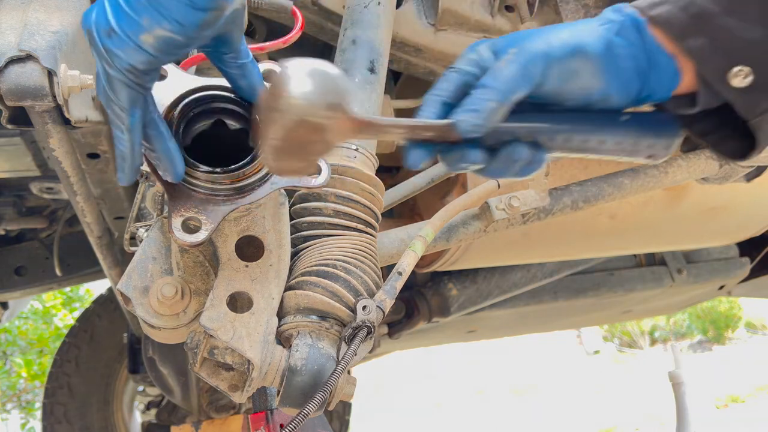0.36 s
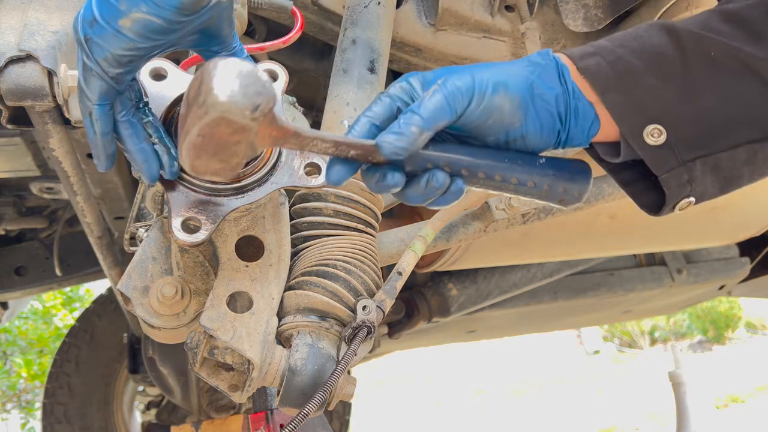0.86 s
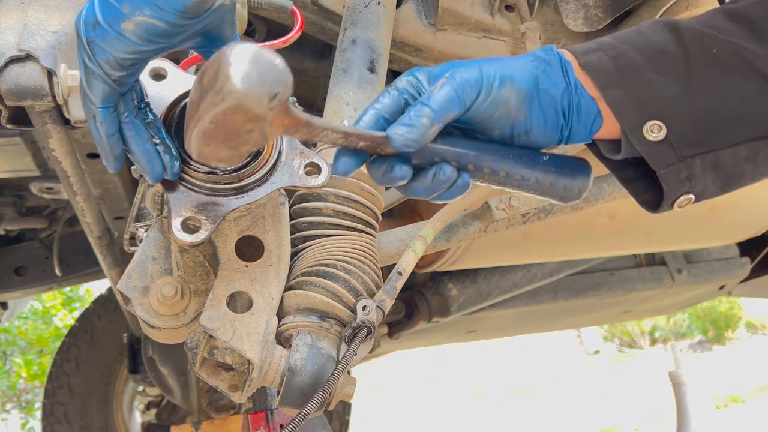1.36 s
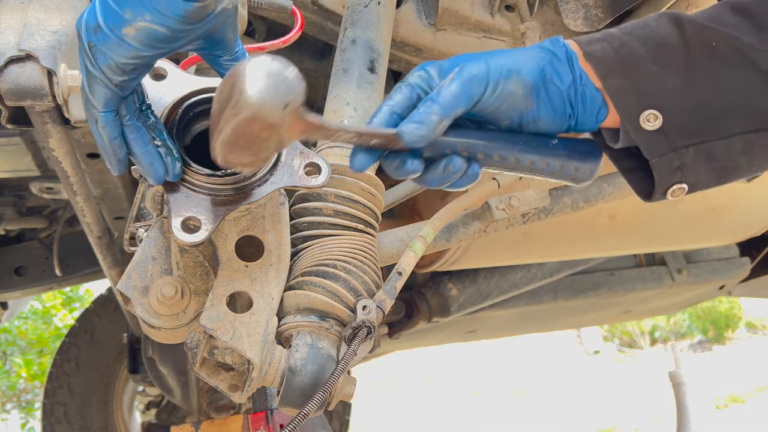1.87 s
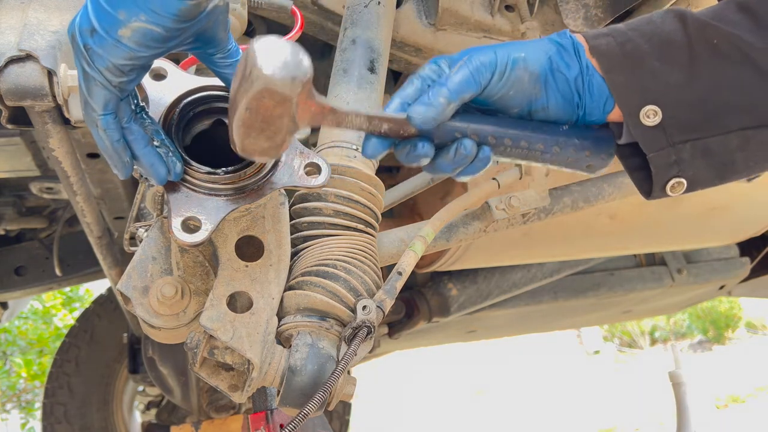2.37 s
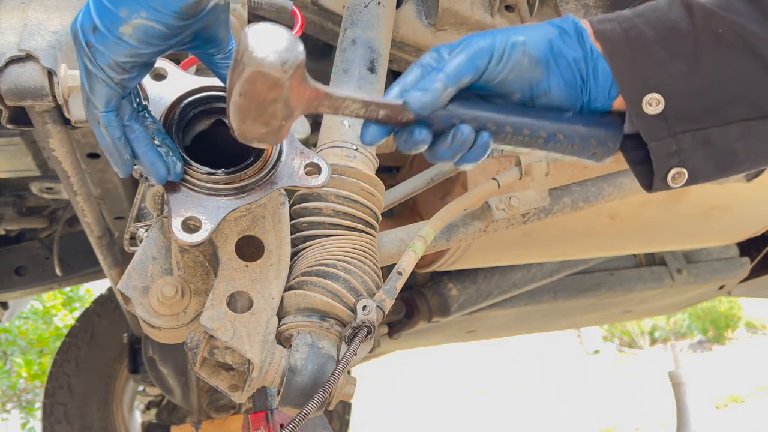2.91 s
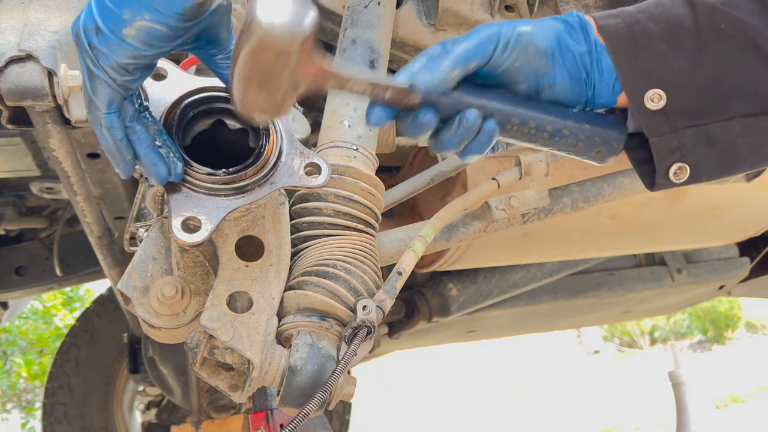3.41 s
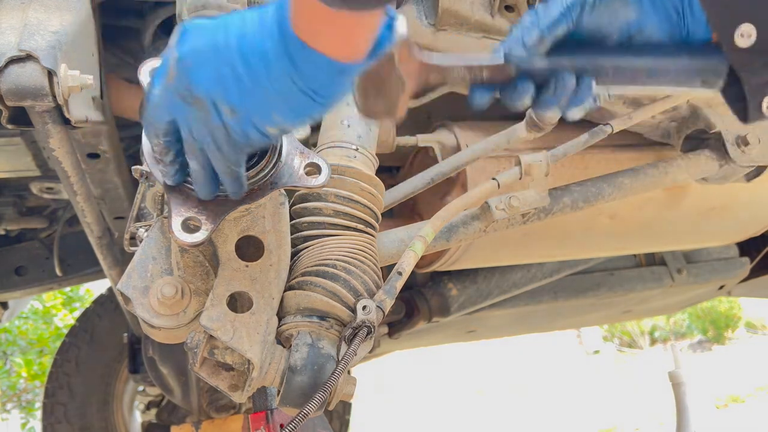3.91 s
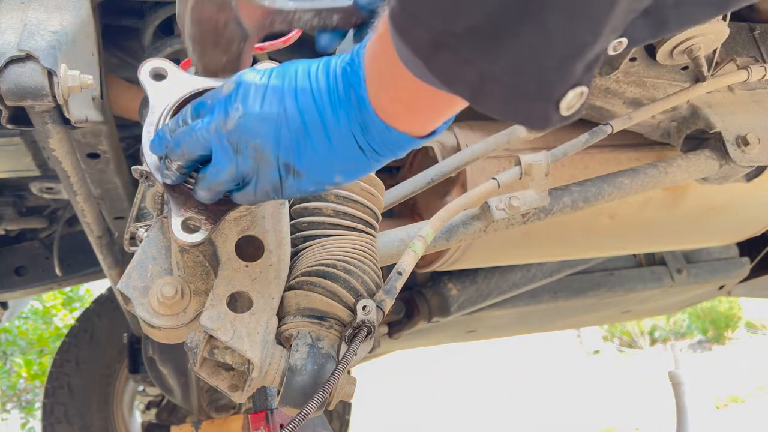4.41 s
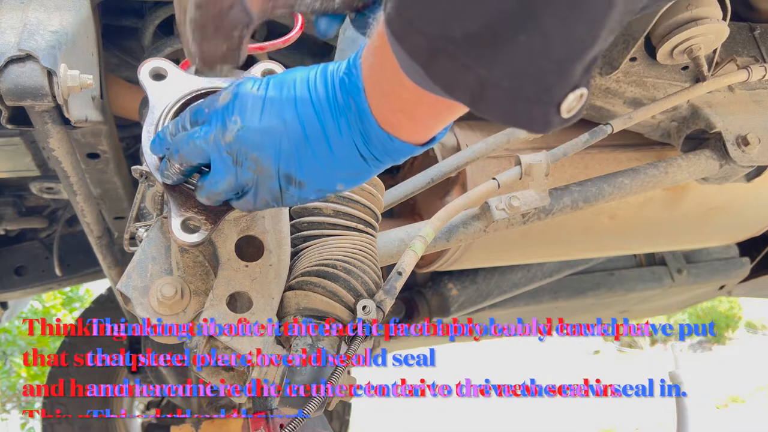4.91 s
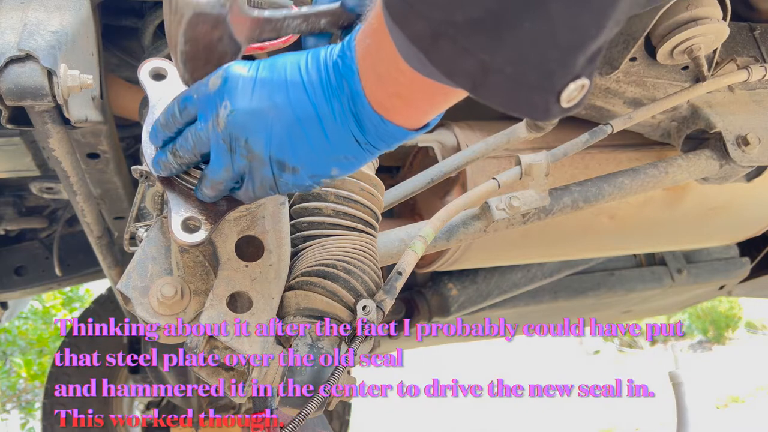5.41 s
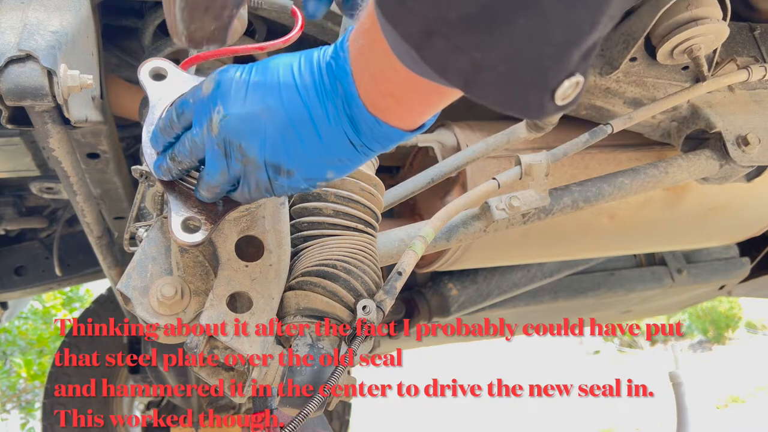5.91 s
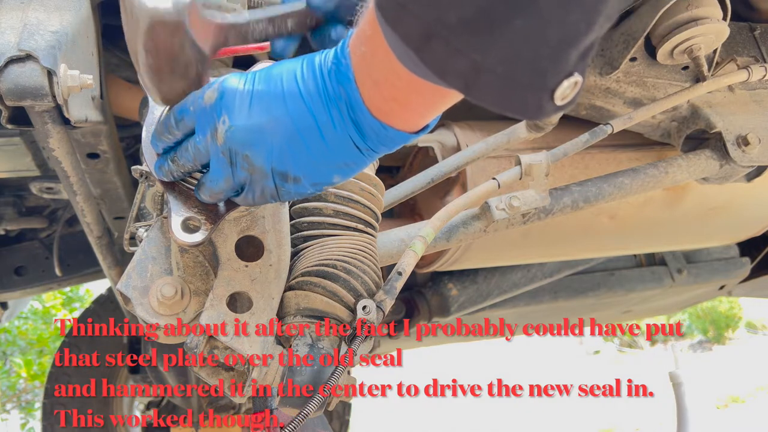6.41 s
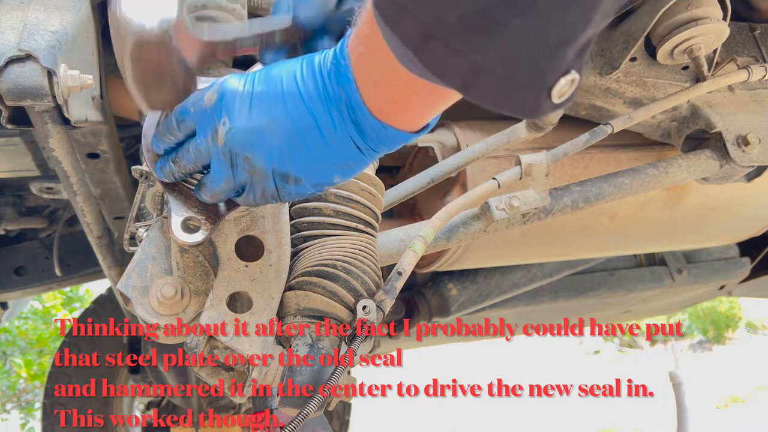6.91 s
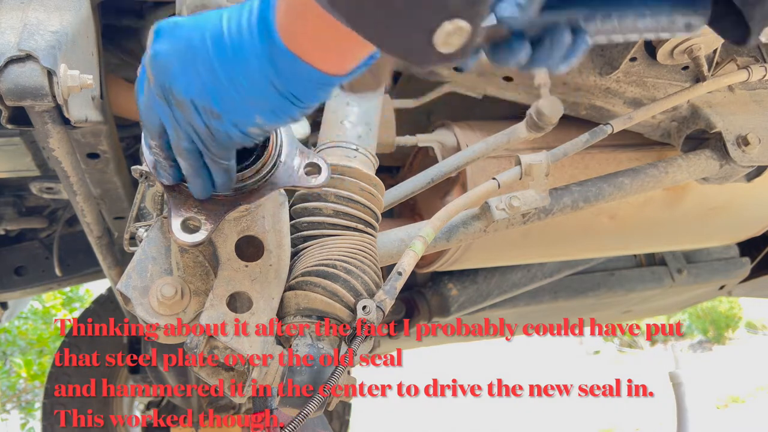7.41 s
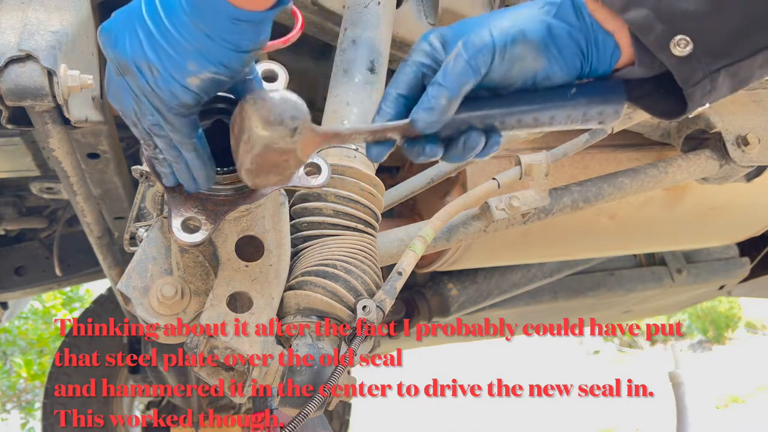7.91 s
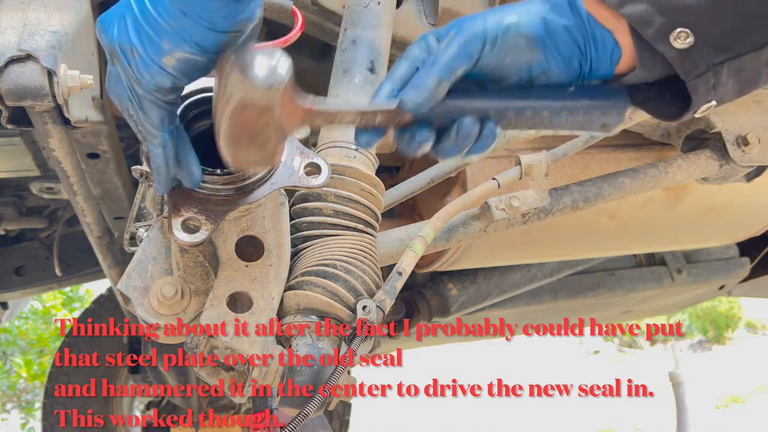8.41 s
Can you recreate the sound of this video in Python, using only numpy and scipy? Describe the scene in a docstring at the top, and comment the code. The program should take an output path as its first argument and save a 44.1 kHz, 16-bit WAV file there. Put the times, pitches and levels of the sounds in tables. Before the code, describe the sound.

Close to a phone under a vehicle, gloves rustle strongly at the very start, then small metal scratches and ticks sound from 0.3 to 0.5 s, slightly left. A light tap at 0.65 s opens a run of hammer blows roughly every 0.27 s, growing firmer until 1.7 s. After a short gap, a very faint tap at 2.25 s leads to four solid hits from 2.5 to 3.4 s. Each is a sharp clack with short metallic ringing, a low suspension thump just behind and a quieter scattered tail. Gloves rustle from 3.5 s, with ticks around 3.9 to 4.3 s. Blows resume at 4.7 s, with weaker taps at 5.04 and 5.4 s and a clink between, then strong regular hits from 5.7 to 6.9 s. Rustling returns around 7.1 to 8.5 s, with three blows at 7.8, 8.1 and 8.4 s. Low rumble swells under the runs.

```python
"""Hammering a seal into a wheel hub

A steel hammer taps a seal into a wheel hub under a vehicle, in short runs, close to a phone.
Each blow is banded noise and decaying metal modes for the crack, low swinging modes for the
suspension's thump just after, and a quieter, longer noise tail scattered by the underbody.
Gloves rustle as patchy hiss and parts tick as short scratches, over a low rumble of coloured
noise whose level is drawn to rise under the runs of blows."""
import sys
import numpy as np
from scipy import signal
from scipy.fft import rfft, irfft, next_fast_len
from scipy.io import wavfile
from scipy.ndimage import uniform_filter1d

SR = 44100
rng = np.random.default_rng(int(sys.argv[2]) if len(sys.argv) > 2 else 0)


def field_ratio(decibels):
    """Amplitude ratio for a level in dB (20 dB per decade); scalars and array-likes work."""
    return 10 ** (np.asarray(decibels, dtype=float) / 20)


def master_out(mix):
    """Clip the mix to full scale and print it as 16-bit PCM to the path in sys.argv[1]."""
    frames = np.transpose(np.atleast_2d(mix))
    ceiling = np.clip(frames, -1, 1)
    pcm = np.round(ceiling * 32767).astype(np.int16)
    wavfile.write(sys.argv[1], SR, pcm)


N = 376613  # samples


def evened(x):
    """Scales to rms 1."""
    return x / np.sqrt(np.mean(x ** 2) + 1e-20)


def read(points, hz):
    """Reads a table on a log-frequency axis."""
    f, value = np.transpose(points)
    return np.interp(np.log(hz + 1), np.log(f + 1), value)


def add(mix, start_s, sound, pan_db):
    """Mixes a two-channel sound in, with pan_db between left and right."""
    part = mix[:, round(start_s * SR):][:, :sound.shape[1]]
    sides = field_ratio(np.array([[pan_db / 2], [-pan_db / 2]]))
    part += (sound * sides)[:, :part.shape[1]]


def pair(shape, likeness):
    """Two random spectra, left and right, partly alike."""
    left, other = rng.standard_normal((2, *shape)) + 1j * rng.standard_normal((2, *shape))
    return np.array([left, likeness * left + np.sqrt(1 - likeness ** 2) * other])


def to_sound(spectra):
    """Overlaps short-time spectra (channel, bin, frame) into sound."""
    return signal.istft(spectra, nperseg=1024, noverlap=768)[1]


def steady(colour, likeness, patchy_db, field_db=0):
    """Noise from random short-time spectra whose level drifts in patches of time and pitch."""
    frames, hz = N // 256 + 5, np.fft.rfftfreq(1024, 1 / SR)
    patches = uniform_filter1d(rng.standard_normal((frames, 513)), 8, 0)
    patches = evened(uniform_filter1d(patches, 12, 1))
    level_db = read(colour, hz) + patchy_db * patches + field_db
    spectra = pair((frames, 513), read(likeness, hz)) * field_ratio(level_db)
    return to_sound(spectra.transpose(0, 2, 1))[:, :N]


def rumble():
    """Low coloured rumble: random noise, mostly bass, with a level that swells under the hammering."""
    # spectrum: hz, level_db (per Hz, relative)
    rumble_colour = [(18, -53), (30, -24.5), (51, -1.5), (76, -2.5), (124, -9), (208, -20.5), (241, -21),
                     (348, -23.5), (375, -37), (413, -29.5), (490, -44), (528, -33), (642, -44),
                     (10500, -71), (13600, -95.5), (22000, -120)]
    # left-right likeness: hz, likeness (0 to 1)
    rumble_likeness = [(60, 0.99), (180, 0.94), (550, 0.73), (1650, 0.14), (4970, 0.1), (15000, 0.12)]
    # level of the low rumble, rising under the runs of blows: time_s, level_db
    rumble_level = [(0.0, -47), (0.7, -47), (1.65, -41), (2.4, -45.5), (3.5, -39.5), (3.8, -45.5),
                    (4.4, -47), (4.95, -43), (5.6, -46.5), (6.55, -42), (7.2, -46), (7.6, -44.5),
                    (7.9, -46.5), (8.54, -41)]
    time_s, level_db = np.transpose(rumble_level)
    noise = evened(steady(rumble_colour, rumble_likeness, patchy_db=0.87))
    return field_ratio(np.interp(np.arange(N) / SR, time_s, level_db)) * noise


def rustle():
    """Gloves and sleeves: patchy hiss; each movement rises, holds and fades, the loudest setting brightness."""
    # spectrum before the brightness tilt: hz, level_db (per Hz, relative)
    rustle_colour = [(290, -32.5), (500, 1.5), (2000, -6), (7300, -7), (9060, -0.5), (10200, -7.5),
                     (12900, -9.5), (15800, -8)]
    # movements: start_s (already fully risen), hold_s, level_db, bright_db (per octave)
    movements = [(0.0, 0.17, -52.5, 0), (0.243, 0.23, -64.5, -2.5), (.52, .12, -69, -2.5),
                 (2.019, .03, -69, 3), (3.521, 0.27, -58, -1.5), (3.85, 0.47, -66, -2.5),
                 (7.097, 0.22, -68.5, -3), (7.364, 0.35, -60, 0), (7.73, .09, -57.5, 1.5),
                 (8.052, .07, -53.5, 3.5), (8.2, .34, -57, 0)]
    rise_s, t60_s = 0.04, 0.33
    still_db, still_bright_db = -81.5, -5.5  # hiss of the air when the hands rest

    start_s, hold_s, level_db, bright_db = np.transpose(movements)[:, :, None]
    frame_s = np.arange(N // 256 + 5) * 256 / SR
    since = frame_s - start_s
    rise = np.clip(since / rise_s + 1, 0, 1)
    fade_db = -60 * np.maximum(since - hold_s, 0) / t60_s
    power = (rise * field_ratio(level_db + fade_db)) ** 2
    still = field_ratio(still_db) ** 2
    total = power.sum(0) + still
    # brightness is averaged by power
    tilt_db = ((power * bright_db).sum(0) + still * still_bright_db) / total

    octaves = np.log2(np.fft.rfftfreq(1024, 1 / SR) / 5000 + 0.01)  # from about 5 kHz
    untilted = field_ratio(read(rustle_colour, 5000 * 2 ** octaves))[:, None]
    plain_level = np.std(to_sound(pair((513, 60), 0) * untilted))
    likeness = [(500, 0.47), (9000, 0.6)]  # hz, left-right likeness
    hiss = steady(rustle_colour, likeness, 1.6, tilt_db[:, None] * octaves) / plain_level
    return hiss * np.interp(np.arange(N) / SR, frame_s, np.sqrt(total))


def tick(level_db, pitch_hz, mode_db):
    """Parts touching lightly: a brief scratch of noise around the pitch, and a small mode at it."""
    t = np.arange(6000) / SR
    band = signal.butter(2, [pitch_hz / 8.4, min(pitch_hz * 2.14, 8800)], "band", fs=SR)
    noise = rng.standard_normal(6000) + 0.5 * rng.standard_normal((2, 6000))  # partly shared by the sides
    scratch = signal.lfilter(*band, noise)
    fade = field_ratio(-60 * t / 0.039) + 0.18 * field_ratio(-60 * t / 0.4)
    mode = field_ratio(mode_db - 60 * t / 0.09) * np.sin(2 * np.pi * pitch_hz * t)
    attack = np.minimum(1, t / 0.0022)
    return field_ratio(level_db) * attack * (0.4 * scratch * fade + mode)


def contacts(rebound_db):
    """The face lands, chatters and lands again a few ms later: times in s and sizes."""
    when, luck = rng.random((2, 4))
    sizes = field_ratio(np.array([0, rebound_db, *(-9 - 42.0 * luck)]))
    times_s = [0, 0.0042, *(0.001 + 0.011 * when)]
    return list(zip(times_s, sizes / np.linalg.norm(sizes)))


def crack_and_scatter(t, hz, colour, touches):
    """Noise in bands: each has a quick crack and a long scattered tail, with snaps at the touches."""
    # bands of a blow: centre_hz, rise_s, crack_db, crack_t60_s, tail_db, tail_t60_s (levels before colour)
    bands = [(69.6, 0.012, -12.5, 0.23, -14, 0.43), (154, 0.0067, -5.5, 0.19, -10.5, 0.55),
             (350, 0.0095, -1, .17, -12, 0.59), (643, 0.0055, -3.5, 0.16, -12, 0.41),
             (1360, 0.0031, 3, 0.07, -15.5, 0.46), (2400, 0.003, -7, 0.061, -19.5, 0.34),
             (4000, 0.00058, -9.5, 0.029, -27, 0.42), (6070, 0.0018, -7, 0.062, -20, 0.45),
             (9840, 0.0051, -5, 0.034, -24.5, 0.27), (9700, .001, 1, 0.016, -25.5, 0.33),
             (15500, 0.0011, -2.5, 0.036, -30, 0.25)]
    # left-right likeness: hz, likeness (0 to 1)
    blow_likeness = [(160, 0.99), (400, 0.66), (900, 0.52), (3500, 0.38), (6000, 0.31), (9000, 0.21),
                     (13000, 0.18)]
    snap = np.zeros(len(t))
    for touch_s, touch_size in touches:
        since = abs(t - touch_s)
        snap += touch_size * (t >= touch_s) * field_ratio(-60 * since / 0.0053) * np.minimum(1, since / 0.00036)
    noise = pair(hz.shape, read(blow_likeness, hz))
    unevenness = evened(uniform_filter1d(rng.standard_normal(len(hz)), size=150))
    noise *= field_ratio(2.2 * unevenness)  # panels answer unevenly

    out = np.zeros((2, len(t)))
    centres = np.transpose(bands)[0]
    for k, (f, rise_s, crack_db, crack_t60, tail_db, tail_t60) in enumerate(bands):
        this_band = np.arange(len(bands)) == k
        share = np.sqrt(read(list(zip(centres, this_band)), hz)) * (hz > 45)  # fades into its neighbours
        shape = field_ratio(crack_db - 60 * t / crack_t60) + field_ratio(tail_db - 60 * t / tail_t60)
        shape *= 1 - np.exp(-(t / rise_s) ** 2)
        shape += field_ratio(crack_db + 12.5) * snap / (1 + (1800 / f) ** 4)  # only the treble follows the brief touches
        out += field_ratio(read(colour, f)) * evened(irfft(noise * share, len(t))) * shape
    return out


def metal_ring(t, crack_db, colour):
    """Hub, seal and hammer head: decaying sine modes, excited differently by each blow."""
    # modes: pitch_hz (before detuning), level_db (before colour and luck), t60_s
    metal_modes = [(1045, -17.5, 0.24), (1477, -15, 0.29), (1910, -13, 0.11), (2176, -6, 0.052),
                   (2105, -9.5, 0.089), (2330, -10, 0.092), (2555, -15.5, 0.12), (2850, -18, .08),
                   (3460, -16.5, 0.074), (4243, -5, 0.039), (4550, -14.5, 0.093), (5100, -21.5, 0.07),
                   (6140, -16.5, .08), (6400, -19.5, 0.15), (6850, -20, 0.11), (8320, -17, 0.097),
                   (8470, -7.5, 0.044), (8740, -9, 0.07), (9260, -8, 0.05)]
    # the cleanest mode of the hammer head: pitch_hz, level_db (before the blow's part and luck), t60_s
    head_ping = (4058, -31, 0.08)
    f, db, t60 = head_ping
    # light blows leave the head free to ping
    ping_db = db - 0.83 * crack_db + 2.5 * rng.standard_normal()
    ring = field_ratio(ping_db - 60 * t / t60) * np.sin(2 * np.pi * f * t + np.array([[0], [0.3]]))
    chances = rng.standard_normal((len(metal_modes), 3))
    for (f, db, t60), (luck, detune, skew) in zip(metal_modes, chances):
        level = field_ratio(db + read(colour, f) + 3.6 * luck - 60 * t / t60)
        phase = np.array([[0], [0.9 * skew]])  # left, right
        ring += level * np.sin(2 * np.pi * f * (1 + 0.015 * detune) * t + phase)
    return ring


def suspension_thump(t, thump_db):
    """The arms and springs, set swinging by the push: low modes that take a while to move."""
    # modes: pitch_hz, level_db (before thump and luck), t60_s
    arm_modes = [(59.5, -14, 0.99), (130, -0.5, .14), (172.3, -8.5, 0.19), (249, -7.5, .4),
                 (303.6, -4.5, 0.53), (326, -9, 0.15), (353, -8.5, 0.31), (405.2, -10.5, 0.34),
                 (443.2, -5, 0.22), (499, -11.5, 0.17), (556, -12.5, 0.076), (670, -13, 0.23),
                 (770, -6.5, .17), (1085, -9.5, 0.18), (1282, -13.5, 0.14)]
    delay_s = 0.0112  # when the arms swing back through rest together
    out = np.zeros((2, len(t)))
    for (f, db, t60), (luck, skew) in zip(arm_modes, rng.standard_normal((len(arm_modes), 2))):
        level = field_ratio(db + thump_db + 2 * luck - 60 * t / t60)
        phase = np.array([[0], [(skew - 0.6) * f / 1500]])  # left, right
        swing = np.sin(2 * np.pi * f * (t - delay_s) + phase)
        out += level * swing * (1 - np.exp(-(t / 0.0064) ** 3))
    return out


def blow(crack_db, thump_db, top_db, rebound_db):
    """One hammer blow: the touches snap and strike metal modes, the arms swing, the underbody scatters."""
    # balance between left and right: hz, pan_db
    lean = [(200, 0), (800, 1.5), (1800, 0), (3500, -2.4), (6000, -5.5), (9000, -0.5)]
    size = 26460  # samples, 0.6 s
    t, hz = np.arange(size) / SR, np.fft.rfftfreq(size, 1 / SR)
    # a glancing blow is bright but thin
    mid_db, edge_db = -0.45 * top_db, 0.69 * top_db
    colour = [(900, thump_db - 4.5), (1500, 0.4 * thump_db - 6.5 + mid_db), (2400, mid_db),
              (3200, -3), (4000, 0), (5000, 0), (8500, top_db), (11500, edge_db)]  # hz, level_db
    touches = contacts(rebound_db)
    out = crack_and_scatter(t, hz, colour, touches)
    ring = metal_ring(t, crack_db, colour) * np.minimum(1, t / 0.0005)
    for touch_s, touch_size in touches:
        add(out, touch_s, touch_size * ring, 0)
    out += suspension_thump(t, thump_db)
    sides = np.array([[0.5], [-0.5]])
    out = irfft(rfft(out) * field_ratio(sides * read(lean, hz)), size)
    fade_out = np.minimum(1, (size - np.arange(size)) / 4000)
    return field_ratio(crack_db) * out * fade_out


def scene():
    """Blows and ticks over rustle and rumble."""
    # hammer blows: start_s, crack_db, thump_db (re crack), top_db (re crack), rebound_db (re first contact)
    blows = [(0.6521, -29.5, -6, 8.5, -6.5), (0.9034, -22, -6, 7.5, -1.5), (1.1726, -19, -3.5, 3.5, -2.5),
             (1.4319, -17.5, -6, 2.5, -2.5), (1.7081, -17, -6, -0.5, -2), (2.2499, -38.5, -8.5, 10, -4.5),
             (2.525, -20, -10, 4.5, 2), (2.822, -18.5, -7.5, 0.4, -7), (3.0932, -21.5, -3.5, 4, -2.5),
             (3.4018, -21, -3.5, 4, -10.5), (4.7266, -20.5, -7.5, 4.5, 1.9), (5.0399, -35, 0, 7.5, -14),
             (5.417, -31, -1.4, 3.5, 2), (5.7063, -17, -11, -2, 0.5), (6.0072, -19, -4.5, 0.5, 4.5),
             (6.297, -17.5, -7, 1, 3.5), (6.5887, -15.5, -10, 2.5, 0), (6.8827, -16, -9, 4, -6),
             (7.83, -27, -2.5, 8.5, 5.5), (8.1213, -20.5, -4, 7.5, -3.5), (8.4017, -20, -2.5, 5.5, -4.5)]
    # parts touching: start_s, level_db, pitch_hz, mode_db (re level), pan_db (left over right)
    ticks = [(0.295, -46, 2460, -24, -10), (0.3435, -35.5, 2280, -28, -5.5), (0.43, -35, 2530, -28, -10),
             (0.489, -46.5, 5070, -20, -7), (3.896, -39, 1800, -22, -9), (4.1048, -40, 7550, -22, -5.5),
             (4.128, -30.5, 3740, -12.5, -8), (4.259, -50.5, 6490, -18, -9), (4.448, -59, 4900, -14, -10),
             (4.555, -56, 2500, -25, -5), (5.3334, -31, 4000, -19, 2.5)]
    mix = rumble() + rustle()
    for start_s, *strength in blows:
        add(mix, start_s, blow(*strength), 0)
    for start_s, *touch, pan_db in ticks:
        add(mix, start_s, tick(*touch), pan_db)
    return mix


def roll_off(x):
    """The treble ends steeply here."""
    return signal.sosfilt(signal.butter(12, 17150, fs=SR, output="sos"), x)


def record(dry):
    """The microphones lose the deepest bass and fall off unevenly in the top; peaks round off."""
    # treble response of the microphones: hz, level_db
    mic_top = [(10000, 0), (10500, -22), (12300, -12.5), (13800, -24.5), (15200, -3), (16200, -9.5),
               (17000, -30)]
    size = next_fast_len(N)
    hz = np.fft.rfftfreq(size, 1 / SR)
    bass_cut = 1 / np.sqrt(1 + (45 / (hz + 1)) ** 8)
    heard = irfft(rfft(dry, size) * field_ratio(read(mic_top, hz)) * bass_cut, size)[:, :N]
    return roll_off(np.tanh(heard))


dry = scene()
out = record(dry)
master_out(out)
```